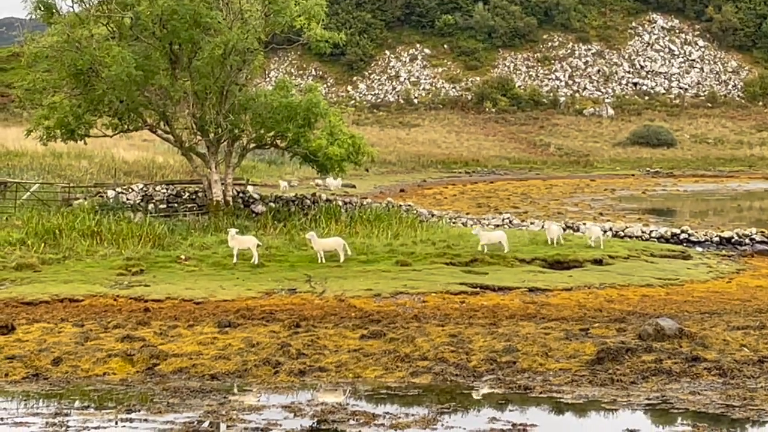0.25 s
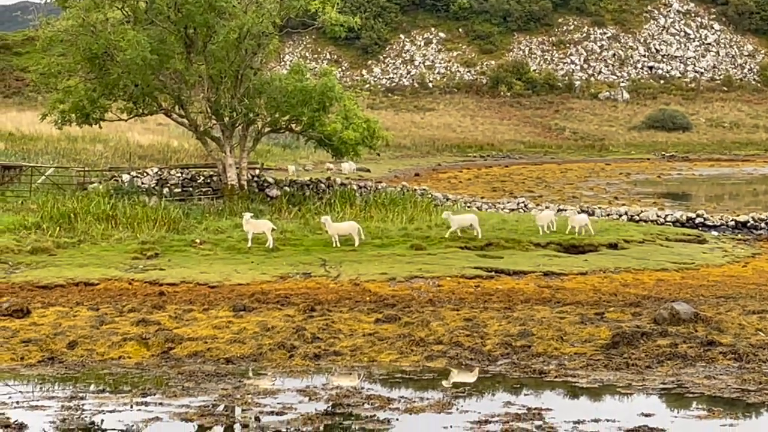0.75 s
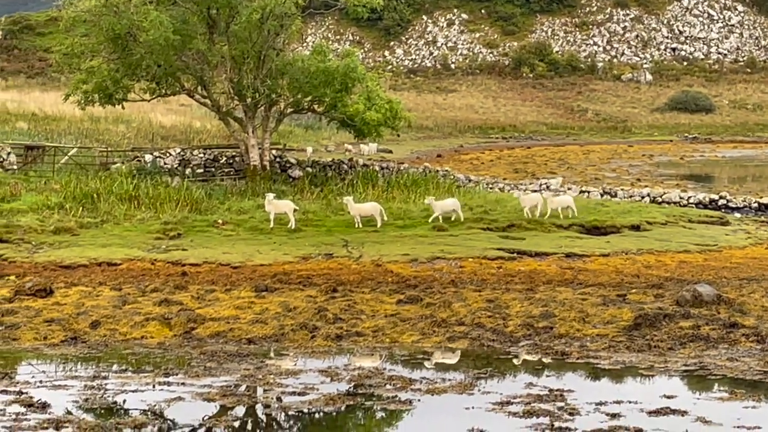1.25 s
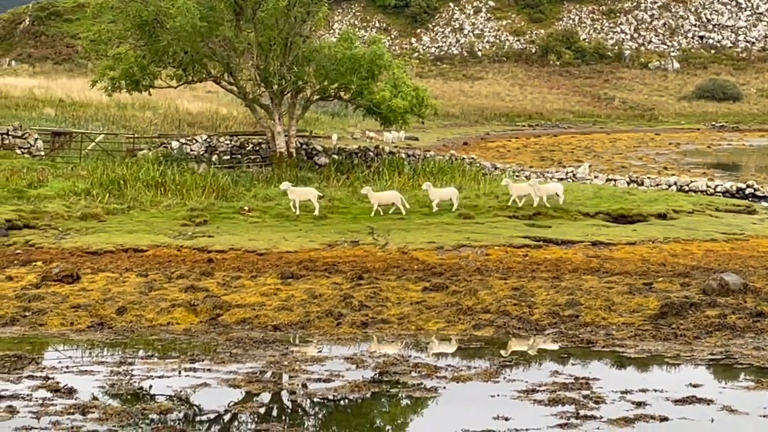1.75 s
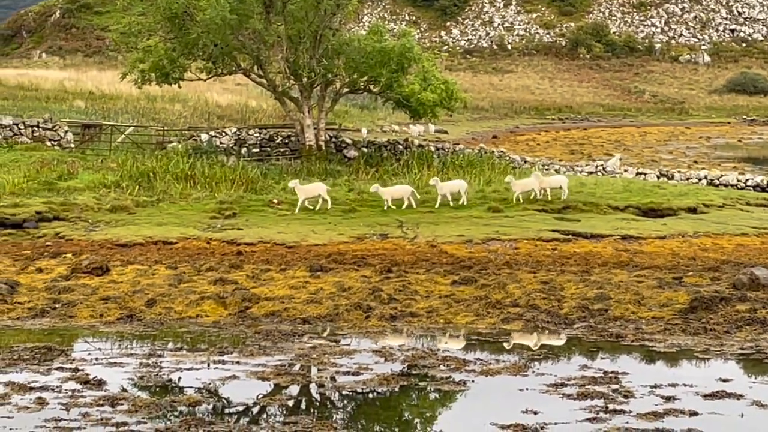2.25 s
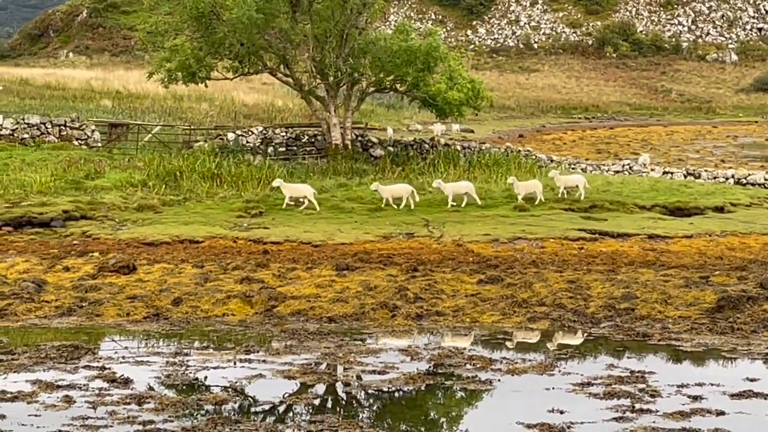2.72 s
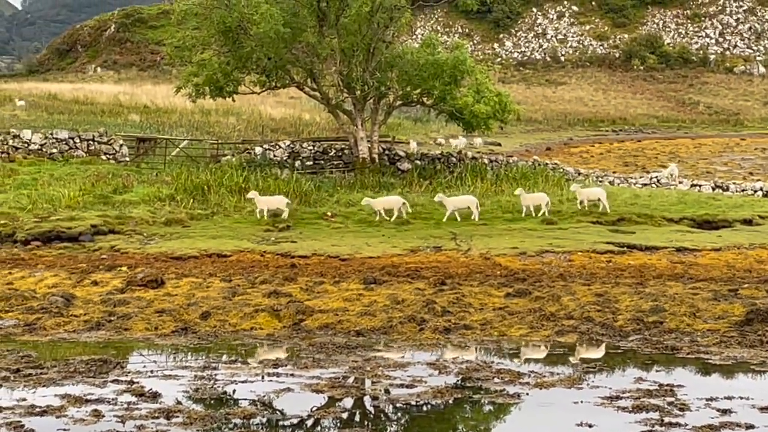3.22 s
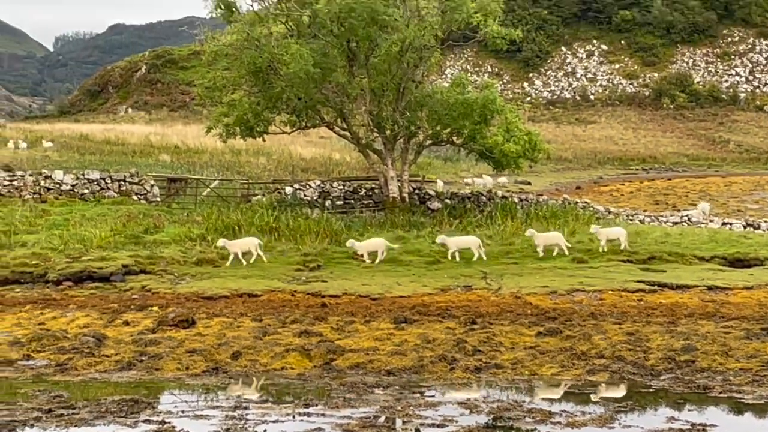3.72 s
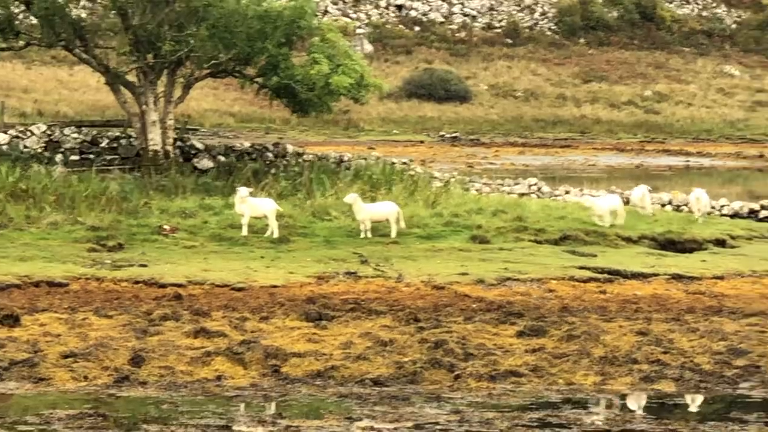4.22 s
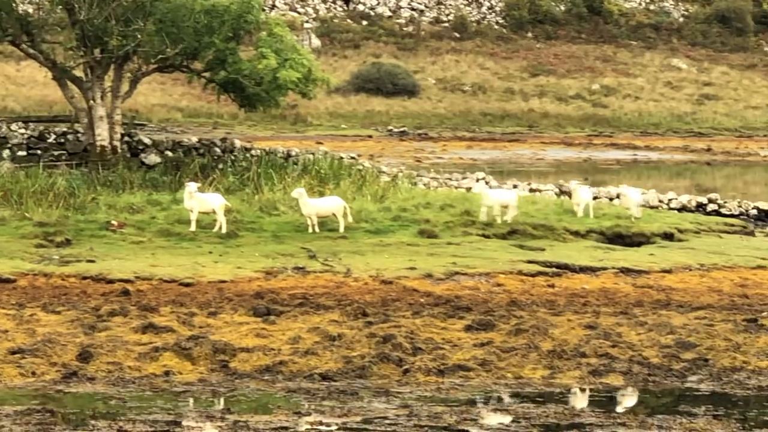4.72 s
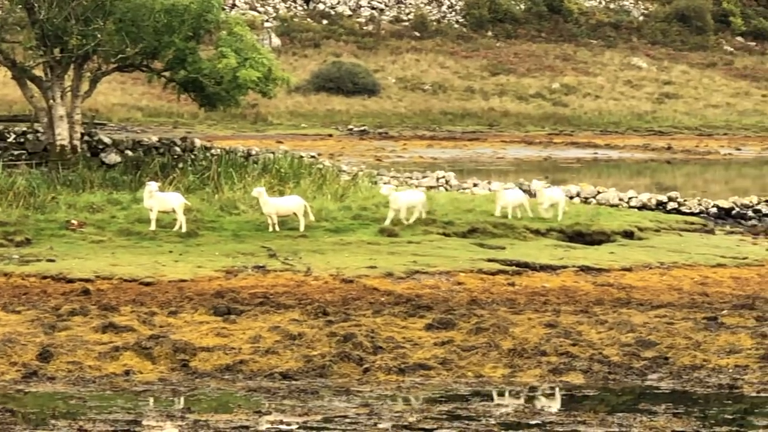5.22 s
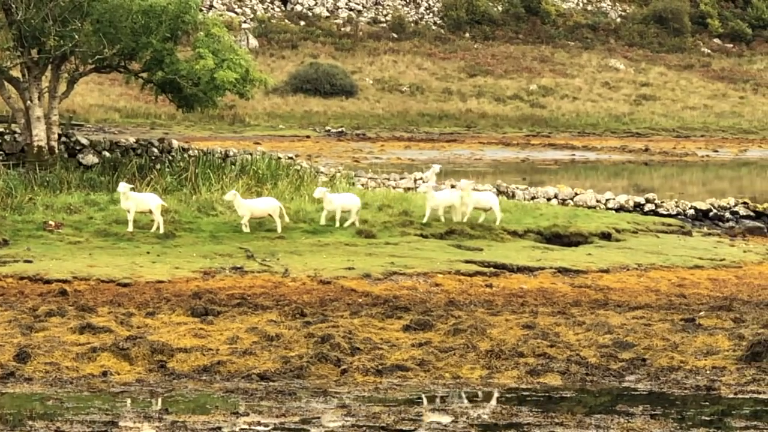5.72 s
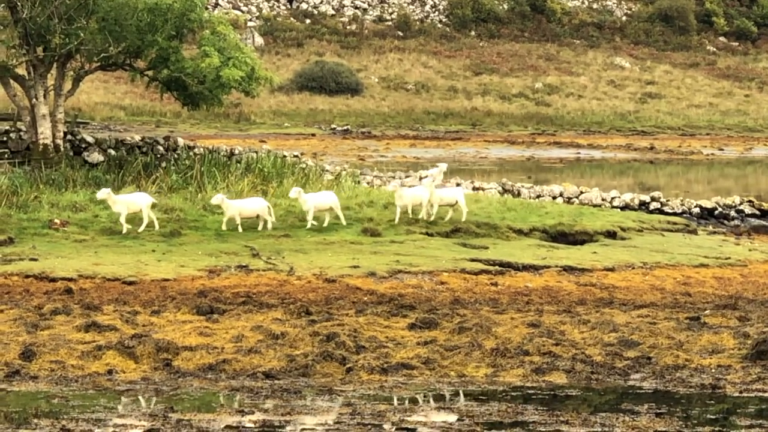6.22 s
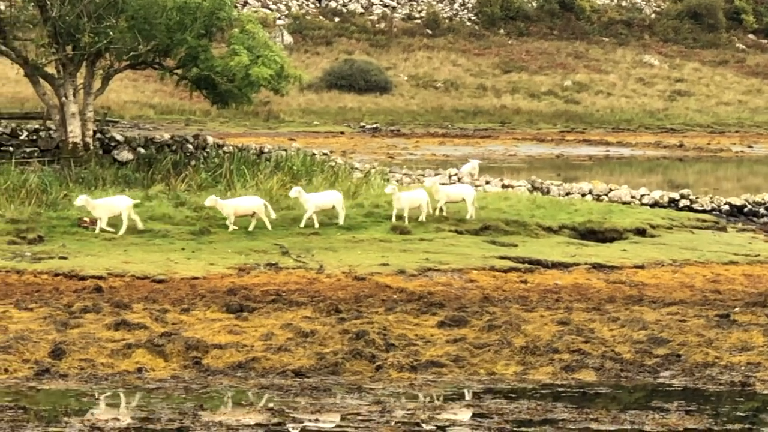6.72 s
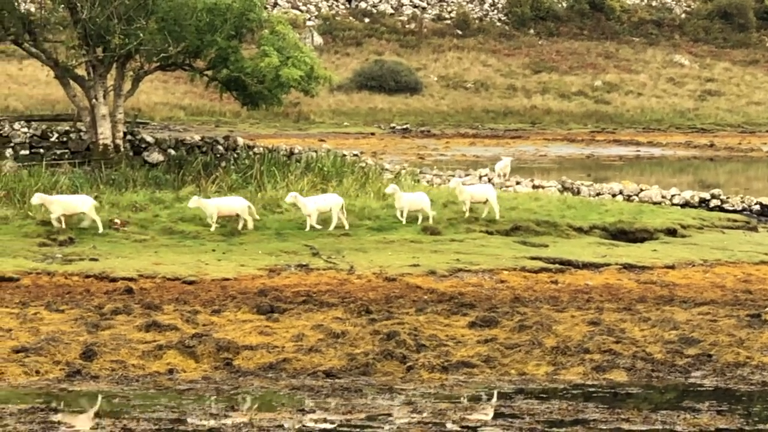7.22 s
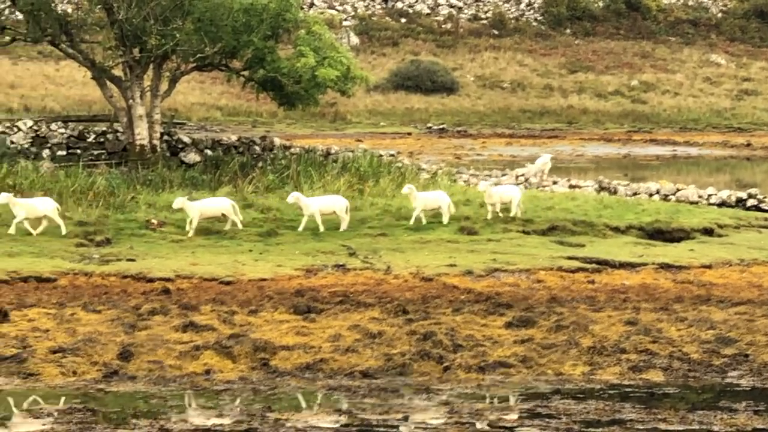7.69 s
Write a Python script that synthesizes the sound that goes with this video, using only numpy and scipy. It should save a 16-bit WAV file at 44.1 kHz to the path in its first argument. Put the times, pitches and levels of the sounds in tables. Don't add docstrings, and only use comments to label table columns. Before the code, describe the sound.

A lamb grunts and gives a quavering bleat on a quiet shore, a deeper ewe answers faintly, then both calls repeat over wind rumble.

```python
import sys
import numpy as np
from scipy import signal
from scipy.fft import rfft, irfft, next_fast_len
from scipy.io import wavfile
from scipy.ndimage import uniform_filter1d

SR = 44100
rng = np.random.default_rng(int(sys.argv[2]) if len(sys.argv) > 2 else 0)


def output_pcm(signal):
    pcm = np.clip(np.atleast_2d(signal).T, -1, 1) * 32767
    wavfile.write(sys.argv[1], SR, np.round(pcm).astype(np.int16))


def ratio_of_db(decibels):
    return 10 ** (np.asarray(decibels, float) / 20)


N = 350903

CHANGE_S = 3.957
LAG_S = 4.203

# (frequency [Hz], density [dB per Hz])
AIR_STEREO = [(220, -32.5), (380, -4.5), (416, -8.5), (749, -14.5), (940, -19), (1430, -25.5), (1620, -25),
              (6010, -32), (7210, -43), (10000, -38.5), (14000, -45)]
AIR_STEREO_SIDE = [(220, -34.5), (380, -1), (477, -4), (546, -14), (749, -7), (1270, -21), (1670, -17),
                   (2700, -40.5), (6010, -41), (7210, -23.5), (14000, -48.5)]
AIR_MONO = [(220, -25.5), (380, -7.5), (404, 1.5), (437, -1), (495, -0.5), (674, -3), (1870, -14.5),
            (8430, -19.5), (14100, -25.5), (15400, -35)]
# (time [s], level [dB])
HISS_SWELL = [(0, 3.5), (.4, 1), (0.901, 0), (2.501, 2.5), (3.4, -2), (3.9, 0.5), (4.2, 0.5), (5.401, 0.5),
              (6.8, 1), (7.96, -1.5)]
AIR_STEREO_DB, AIR_MONO_DB = -78, -77.5
# (time [s], gust level [dB])
WIND = [(0, -48.5), (.54, -46), (.62, -58.5), (.81, -46.5), (1.0, -62.5), (1.09, -46), (1.75, -50),
        (2.3, -53), (3.51, -59), (3.78, -53), (3.93, -50), (4.08, -61), (5.4, -64), (5.7, -61),
        (6.44, -66.5), (7.96, -71.5)]
LUMP_DB = 1.5
# (time [s], level [dB])
TRAFFIC = [(0, -60.5), (1.0, -63.5), (1.75, -59.5), (2.3, -59.5), (3.19, -66), (3.51, -63.5), (3.9, -64)]
MONO_TRAFFIC_DB = -5.5
# (frequency [Hz], density [dB per Hz])
GUST_STEREO = [(20, -35), (34, -6.5), (65, 4), (108, -0.5), (120, -0.5), (151, -15.5), (160, -12.5),
               (210, -38), (350, -120)]
GUST_MONO = [(20, -35.5), (34, -14), (59, 10.5), (80, -8), (97, -3), (108, 11), (160, -6), (210, -31.5),
             (350, -120)]
DRONE_STEREO = [(76, -24.5), (130, -1), (178, -8.5), (221, -2.5), (258, -12), (450, -39), (580, -75.5),
                (990, -120)]
DRONE_MONO = [(76, -32.5), (130, -22), (200, 0.5), (242, -17), (318, -15.5), (450, -30.5), (580, -60.5),
              (990, -120)]
# (time [s], firing rate [Hz], first order level [dB], second order level [dB])
ENGINE = [
    (1.0, 84.7, -62, -80.5),
    (1.55, 76.26, -59.5, -67),
    (1.9, 76.8, -54.5, -72),
    (3.17, 74.96, -60, -63.5),
    (3.95, 67.25, -51.5, -61),
]
MONO_FIRST_DB, MONO_SECOND_DB, WAVER = -14, -3.5, 0.01528
# (frequency [Hz], width [Hz], stereo level [dB], mono level [dB])
HUM = [
    (104.88, 4.54, -56, -71),
    (211.5, 8.7, -64.5, -71),
    (319.8, 11.8, -75, -74.5),
    (149.7, 4.2, -76, -85.5),
]

# (time [s], length [s], first pitch [Hz], last pitch [Hz],
# level [dB])
FAINT_NOTES = [
    (0.047, 0.17, 1695, 1645, -94.5),
    (0.541, .016, 3220, 3600, -79),
    (3.954, 0.069, 2900, 2432, -87),
    (4.43, .09, 4150, 4180, -93),
    (4.721, 0.019, 3250, 3600, -81),
    (4.0, .35, 3800, 3770, -97),
    (5.08, .12, 7150, 6900, -96),
]
NOTE_SWELL_DB = 6.5
# (time [s], level [dB], pitch factor [1])
CHIRPS = [
    (.438, -81, 0.99),
    (0.586, -79, 1),
    (.992, -80, 1),
    (4.614, -84, 1),
    (4.762, -80, 1.0),
    (5.167, -80.5, 1.0),
]
# (time [s], pitch [Hz], level [dB])
CHIRP_SHAPE = [(0, 3320, -4), (0.014, 3900, -1), (.027, 4350, 6), (0.038, 5110, 1.5), (.046, 4750, 3),
               (0.05, 4710, -12), (.057, 5400, -0.5), (.066, 5380, -4), (0.074, 5000, -9)]
THROB_HZ, THROB_DEPTH = 85, .6
# (time [s], level [dB])
ARCHES = [
    (1.369, -79),
    (2.882, -89),
    (2.984, -89.5),
    (5.548, -81),
]
# (time [s], pitch [Hz], level [dB])
ARCH_SHAPE = [(0, 4360, -9), (.008, 4820, -1.5), (.018, 5600, -1), (.03, 5100, 1.5), (.04, 4230, -1)]

HILL_GAP_S, SLAP_S, SLAP_DB = 0.014, .2, -15

# (time [s], level [dB], mouth shift [0-1])
GRUNT = [
    (1.294, -76, 0.1),
    (1.305, -62, 0),
    (1.322, -61.5, 0),
    (1.337, -53, 0.27),
    (1.392, -55.5, 0.9),
    (1.403, -65.5, 0.7),
    (1.43, -71.5, .5),
]
# (time [s], level [dB], mouth shift [0-1])
LAMB = [
    (1.436, -61, .4),
    (1.449, -45.5, 0.4),
    (1.465, -38, 0.33),
    (1.6, -34.5, 0.4),
    (2.02, -43.5, 0.43),
    (2.09, -44, 0.81),
    (2.13, -48.5, 0.89),
    (2.197, -49, 0.99),
    (2.21, -56.5, 1),
    (2.25, -60.5, 0.86),
]
# (time [s], level [dB])
EWE = [
    (2.23, -59.5),
    (2.33, -57.5),
    (2.6, -58),
    (2.9, -60),
    (2.98, -62),
    (3.004, -67),
]
# (time [s], pitch [Hz])
LAMB_PITCH = [(1.29, 206.3), (1.39, 224.3), (1.431, 212.9), (1.47, 235.8), (1.538, 246), (1.679, 243.9),
              (1.921, 236), (2.098, 230.2), (2.118, 220.1), (2.27, 214.9)]
EWE_PITCH = [(2.22, 173.4), (2.282, 171), (2.576, 178.5), (2.92, 171.6), (2.942, 168), (3.01, 155.4)]
# (time [s], half length [s], pitch drop [Hz], level drop [dB], added breath [0-1])
CATCHES = [(1.336, 0.0089, 13.5, -1, 0.47), (1.492, 0.022, 26.5, 3, 1), (1.572, .018, 14, -0.5, 0),
           (1.638, 0.014, 18.5, 3, 0), (1.712, .026, 30, 6.5, 0.5), (1.79, 0.024, 11.5, 1, 0.26),
           (1.979, 0.0246, -4.5, 0, 0.05), (2.048, 0.025, 18, 5.5, 0.62), (1.868, .015, 5, 0.5, 0),
           (2.164, .014, 6, 1.5, .3), (2.234, .03, 4, 0, .45)]
# (time [s], pitch [Hz], level [dB])
LOWING = [(1.3, 214.4, -56), (1.5, 239.9, -68.5), (2.0, 234.9, -57), (2.15, 219.4, -59), (2.3, 201.5, -51),
          (2.449, 189.6, -54.5)]
MONO_LOWING_DB = -9.5
# (frequency [Hz], density [dB per Hz])
GRUNT_STEREO_THROAT = [(240, -47), (400, -7), (896, -4), (1100, -1), (1320, -23.5), (1670, 2), (1950, 4.5),
                       (2300, -12.5), (2700, -7), (4200, -54), (5460, -70), (9240, -120)]
GRUNT_STEREO_OPEN = [(240, -45.5), (400, -8), (896, 0), (1100, -3.5), (1320, -14.5), (1600, 5.5), (1950, 2),
                     (2300, -7), (2860, 4.5), (3350, -11.5), (4200, -40.5), (5460, -72), (9240, -120)]
GRUNT_MONO_THROAT = [(240, -40), (400, 0), (548, -20), (837, -2), (1470, -7.5), (1930, 2.5), (2420, 10),
                     (2650, -17), (3280, -20), (4200, -45), (5460, -54), (9240, -120)]
GRUNT_MONO_OPEN = [(240, -40), (400, -5), (548, -14), (837, 1), (1470, -8), (1930, 1), (2420, 4),
                   (2650, -4), (3280, -1), (4200, -37), (5460, -49), (9240, -120)]
LAMB_STEREO_WIDE = [(240, -48.5), (400, -21.5), (474, -4.5), (745, 1.5), (997, -18), (1210, -32),
                    (1430, 1.5), (1630, 5), (1770, 0), (2160, -41.5), (2360, 3), (2510, 3.5), (3710, -18.5),
                    (4400, -32.5), (5720, -42.5), (9680, -120)]
LAMB_STEREO_NARROW = [(240, -36), (400, -6), (442, -14), (681, 1.5), (1110, -8), (1400, -4.5), (1730, -10),
                      (2200, -1.5), (2950, -0.5), (3100, 1), (3320, -22), (3790, -7), (4400, -52),
                      (5720, -85), (9680, -120)]
LAMB_SIDE = [(240, -39), (400, -5), (731, 0), (1180, -23), (1450, -7.5), (1740, 6), (1980, -16),
             (2120, -24), (2950, -7.5), (3800, -42), (4940, -73), (8360, -120)]
LAMB_MONO_WIDE = [(240, -37), (400, -25.5), (745, -7.5), (997, -11.5), (1210, -31), (1490, -4.5),
                  (1880, -12), (2160, 1), (2480, 8.5), (2750, -23), (3010, 2), (3460, -10.5), (4100, -54),
                  (4400, -17.5), (5720, -77), (9680, -120)]
LAMB_MONO_NARROW = [(240, -42), (400, -9), (674, 0.5), (1090, -14), (1530, -0.5), (1950, -17), (2430, 4.5),
                    (2770, -9.5), (3070, -8.5), (3320, -15), (3790, -9), (4400, -43), (5720, -54),
                    (9680, -120)]
EWE_STEREO_THROAT = [(94, -38), (160, -3.5), (188, 5), (336, -20), (552, -23), (897, -22.5), (1080, -30),
                     (1440, -23.5), (1670, -38), (1990, -12), (2210, -13.5), (2930, -25.5), (4000, -60),
                     (5200, -90), (8800, -120)]
EWE_SIDE = [(94, -32), (160, 1), (322, 7), (545, -21), (1270, -21.5), (2120, 1), (2530, -18), (2970, -24),
            (4000, -58), (5200, -89), (8800, -120)]
EWE_MONO_THROAT = [(94, -23), (160, 0), (327, -4.5), (476, -26), (676, -20), (862, -9.5), (1330, -27.5),
                   (1880, -9), (2150, -7.5), (2330, -23), (2670, -8), (3400, -28), (4000, -27), (5200, -54),
                   (8800, -120)]
# (frequency [Hz], density [dB per Hz])
TOP_STEREO = [(2350, -44), (4000, -10), (4400, -9), (4800, -15), (5200, 0.5), (5550, 4), (5950, -14),
              (6400, 4), (6800, -19), (7250, -12), (7800, -31.5), (9000, -26), (10100, -15.5), (12300, -36),
              (13000, -36.5)]
TOP_STEREO_LATE = [(2350, -46.5), (4000, -9), (4600, -16.5), (5150, -5.5), (5650, 3.5), (6050, -21),
                   (6500, 0.5), (6900, -21), (7900, -32.5), (8400, -17), (8900, -31), (10100, -24.5),
                   (12300, -40), (13000, -41)]
TOP_MONO = [(2350, -35), (4000, -6.5), (4960, -22), (5550, 2.5), (6090, -19), (6600, -2), (7310, -28),
            (7900, -9), (8490, -25), (9220, -18), (12000, -32.5), (13600, -24), (15000, -35)]
TOP_MONO_LATE = [(2350, -32), (4000, -5), (4960, -21), (5750, 1), (6200, -14), (6900, -4), (7400, -21),
                 (8000, -11.5), (8600, -23), (9220, -20), (12000, -38), (13600, -28), (15000, -38.5)]
TOP_SIDE = [(6300, -10.5), (7200, 8), (9000, -13.5), (12500, -19)]
TOP_TURNS_S, TOP_TURN_LENGTH_S = 1.57, .25
TOP_PATCH_DB, LAMB_SHIMMER_DB, EWE_SHIMMER_DB = 1.9, 1.5, .9
VEIL_LIFTS_S, VEIL_LIFT_LENGTH_S, VEIL_DB_PER_BAND = 1.48, .04, 0.9
MONO_SQUEEZE = 0.78
CHEST_HZ, CHEST_KEEPS = 793, 0.96
SHUT_FROM, SHUT_LOSS_DB = .87, 16
BREATH_PER_DB, LAMB_BREATH, GRUNT_BREATH, EWE_BREATH = .006, .07, .42, .26

# (time [s], peak level [dB], pitch [Hz])
TICKS = [
    (3.234, -64.5, 3820),
    (3.5516, -69.5, 9800),
    (4.1, -67, 3130),
    (4.3395, -65, 5750),
    (4.5356, -69, 2940),
    (5.027, -68, 4880),
    (3.397, -73, 5810),
    (6.95, -67, 6097),
    (7.267, -72, 5700),
]
# (time [s], level [dB])
BRUSH = [
    (3.84, -87),
    (3.906, -71),
    (3.97, -72),
]


def one(x):
    return x / np.sqrt(np.mean(x ** 2) + 1e-20)


def columns(rows):
    s, *values = np.transpose(rows)
    start = max(0, round(s[0] * SR))
    t = np.arange(start, min(N, round(s[-1] * SR))) / SR
    fade = np.clip(np.minimum(t - s[0], s[-1] - t) / 0.0047, 0, 1)
    return start, fade, [np.interp(t, s, v) for v in values]


def add(out, start, x):
    out[..., start:start + x.shape[-1]] += x[..., :N - start]


def colour(x, spectrum):
    size = next_fast_len(len(x) + 4096)
    hz, db = np.transpose(spectrum)
    log_f = np.log(np.maximum(np.fft.rfftfreq(size, 1 / SR), 1))
    knots_hz = np.r_[hz[0] / 2, hz, hz[-1] * 1.2]
    knots_db = np.r_[db[0] - 40, db, db[-1] - 40]
    log_gain = np.interp(log_f, np.log(knots_hz), knots_db) * np.log(10) / 20
    cepstrum = irfft(log_gain, size)
    cepstrum[1:size // 2] *= 2
    cepstrum[size // 2 + 1:] = 0
    return irfft(rfft(x, size) * np.exp(rfft(cepstrum)), size)[:len(x)]


def drift(rate, size):
    r = np.exp(-2 * np.pi * rate / SR)
    settle = SR // 3
    return one(signal.lfilter([1], [1, -2 * r, r * r], rng.standard_normal(size + settle))[settle:])


def air(spectrum, db):
    swell_db = np.interp(np.arange(N) / SR, *np.transpose(HISS_SWELL))
    return ratio_of_db(db + swell_db) * one(colour(rng.standard_normal(N), spectrum))


def rumble(t0, t1, gust, drone, lag=0, drone_db=0):
    start, fade, _ = columns([(t0, 0), (t1, 0)])
    t = (start + np.arange(len(fade))) / SR
    gust_db = np.interp(t, *np.transpose(WIND)) + LUMP_DB * drift(4.4, len(t))
    traffic_db = np.interp(t - lag, *np.transpose(TRAFFIC)) + drone_db
    white, out = rng.standard_normal((2, len(fade))), np.zeros(N)
    wind = ratio_of_db(gust_db) * one(colour(white[0], gust))
    traffic = ratio_of_db(traffic_db) * one(colour(white[1], drone))
    add(out, start, fade * (wind + traffic))
    return out


def hums():
    stereo, out = np.clip((CHANGE_S - np.arange(N) / SR) / 0.018, 0, 1), np.zeros(N)
    for hz, width_hz, stereo_db, mono_db in HUM:
        sos = signal.butter(2, [hz - width_hz / 2, hz + width_hz / 2], "band", fs=SR, output="sos")
        hum = one(signal.sosfilt(sos, rng.standard_normal(N + SR))[SR:])
        out += hum * ratio_of_db(stereo * stereo_db + (1 - stereo) * mono_db)
    return out


def glide(rows, flutter_db, throb=0):
    start, fade, (hz, db) = columns(rows)
    phase = 2 * np.pi * np.cumsum(uniform_filter1d(hz, 100)) / SR
    t = np.arange(len(hz)) / SR
    fade = fade * (1 + throb * np.cos(2 * np.pi * THROB_HZ * (t - .004)))
    out = np.zeros(N)
    add(out, start, np.sqrt(2) * ratio_of_db(db + flutter_db * drift(40, len(hz))) * fade * np.sin(phase))
    return out


def birds():
    chirps = [np.array(CHIRP_SHAPE) * [1, factor, 1] + [s, 0, db] for s, db, factor in CHIRPS]
    chirps += [np.array(ARCH_SHAPE) + [s, 0, db] for s, db in ARCHES]
    song = sum(glide(rows, flutter_db=3.0, throb=THROB_DEPTH) for rows in chirps)
    for s, length, hz, end_hz, db in FAINT_NOTES:
        rows = [(s, hz, db - NOTE_SWELL_DB),
                (s + length / 2, (hz + end_hz) / 2, db),
                (s + length, end_hz, db - NOTE_SWELL_DB)]
        song += glide(rows, flutter_db=6.0)
    return song


def hillside(x, t60, cut_hz, slap_db):
    t = np.arange(round(.6 * SR)) / SR
    slope = ratio_of_db(-60 * t / t60) * (t > HILL_GAP_S)
    bank = ratio_of_db(slap_db - 60 * (t - SLAP_S) / 0.58) * (t > SLAP_S)
    tail = rng.standard_normal((2, len(t))) * (slope + bank)
    tail = signal.sosfilt(signal.butter(2, [950, cut_hz], "band", fs=SR, output="sos"), tail)
    tail = tail / np.sqrt(np.sum(tail ** 2, axis=1, keepdims=True))
    return signal.fftconvolve(x[None], tail, axes=1)[:, :N]


def engine():
    out = np.zeros(N)
    for rows in ENGINE, np.array(ENGINE[1:]) + [LAG_S, 0, MONO_FIRST_DB, MONO_SECOND_DB]:
        start, fade, (hz, first_db, second_db) = columns(rows)
        phase = 2 * np.pi * np.cumsum(hz * (1 + WAVER * drift(3.0, len(hz)))) / SR
        orders = ratio_of_db(first_db) * np.sin(phase) + ratio_of_db(second_db) * np.sin(2 * phase)
        add(out, start, np.sqrt(2) * fade * orders)
    return out


def effort(rows, breath, top_db, top_db_per_s, lag=0, gain_db=0):
    s, db, *mouth = np.transpose(rows)
    below_db = db.max() - db
    heard_db = db.max() + gain_db - below_db * (MONO_SQUEEZE if lag else 1)
    return np.transpose([s + lag, heard_db, top_db + top_db_per_s * (s - s[0]), breath + BREATH_PER_DB * below_db,
                         mouth[0] if mouth else 0 * s])


def larynx(t, pitch, catches):
    hz, loss_db, breath = np.interp(t, *np.transpose(pitch)), 0, 0
    for s, half_s, drop_hz, drop_db, puff in catches:
        dip = np.cos(np.pi / 2 * np.clip((t - s) / (half_s * 1.4), -1, 1)) ** 2
        hz = hz - drop_hz * dip
        loss_db = loss_db + drop_db * dip
        breath = breath + puff * dip
    return hz, loss_db, breath


def glottis(hz, shimmer_db):
    size = len(hz)
    jitter = .003 * drift(70, size) + .002 * shimmer_db * drift(14, size)
    phase = 2 * np.pi * np.cumsum(uniform_filter1d(hz, 200) * (1 + jitter)) / SR
    shimmer = [ratio_of_db(shimmer_db * drift(12, size)) for _ in range(8)]
    pulses = one(sum(shimmer[k // 2 % 8] * np.cos(k * phase) for k in range(1, 61)))
    puffs = one(rng.standard_normal(size) * (1 + np.cos(phase)) ** 2)
    return pulses, puffs


def patchy(x, depth_db, veil_db):
    edges = 3200 * 2 ** (np.arange(8) / 3)
    out = 0
    for k, band in enumerate(zip(edges, edges[1:])):
        part = signal.sosfilt(signal.butter(2, band, "band", fs=SR, output="sos"), x)
        gain = ratio_of_db(depth_db * drift(8.9, len(x)) - k * veil_db)
        out = out + (-1) ** k * gain * part
    return out


def bleat(rows, pitch, catches, wide, narrow, top, side, side_db, lag=0, shimmer_db=LAMB_SHIMMER_DB):
    start, fade, (db, top_db, breath, shift) = columns(rows)
    t = (start + np.arange(len(db))) / SR - lag
    hz, loss_db, puff = larynx(t, pitch, catches)
    pulses, puffs = glottis(hz, shimmer_db)
    chest = signal.sosfilt(signal.butter(4, CHEST_HZ, fs=SR, output="sos"), pulses)
    shut = np.clip((shift - SHUT_FROM) / (1 - SHUT_FROM), 0, 1)
    chest_db = CHEST_KEEPS * loss_db - SHUT_LOSS_DB * shut
    breath, shift = np.clip(breath + puff, 0, 1), np.clip(shift, 0, 1)
    source = np.sqrt(1 - breath ** 2) * pulses + breath * puffs
    source = signal.sosfilt(signal.butter(4, CHEST_HZ, "high", fs=SR, output="sos"), source)
    source = source + ratio_of_db(chest_db) * chest
    mid = (1 - shift) * one(colour(source, wide)) + shift * one(colour(source, narrow))
    rasp = .85 * source + .5 * puffs
    top_gain = ratio_of_db(top_db - 0.25 * loss_db + 1.0 * drift(22, len(hz)))
    turn = np.clip((t - TOP_TURNS_S) / TOP_TURN_LENGTH_S, 0, 1)
    veil_db = VEIL_DB_PER_BAND * np.clip(1 - (t - VEIL_LIFTS_S) / VEIL_LIFT_LENGTH_S, 0, 1)
    bright = (1 - turn) * one(colour(rasp, top[0])) + turn * one(colour(rasp, top[1]))
    mid += top_gain * patchy(bright, TOP_PATCH_DB, veil_db)
    off_axis = -ratio_of_db(side_db) * one(colour(source, side))
    off_axis += ratio_of_db(-7.5) * top_gain * one(colour(np.roll(rasp, 9), TOP_SIDE))
    out = np.zeros((2, N))
    add(out, start, np.array([mid, off_axis]) * ratio_of_db(db - loss_db) * fade)
    return out


def flock():
    top_stereo, top_mono = (TOP_STEREO, TOP_STEREO_LATE), (TOP_MONO, TOP_MONO_LATE)
    lamb = bleat(effort(GRUNT, GRUNT_BREATH, top_db=-34.0, top_db_per_s=93), LAMB_PITCH, CATCHES,
                 GRUNT_STEREO_THROAT, GRUNT_STEREO_OPEN, top_stereo, LAMB_SIDE, side_db=-13.5)
    lamb += bleat(effort(LAMB, LAMB_BREATH, top_db=-20.5, top_db_per_s=-17.5), LAMB_PITCH, CATCHES,
                  LAMB_STEREO_WIDE, LAMB_STEREO_NARROW, top_stereo, LAMB_SIDE, side_db=-12.5)
    lamb += bleat(effort(GRUNT, GRUNT_BREATH, top_db=-28, top_db_per_s=68, lag=LAG_S, gain_db=-6.0),
                  LAMB_PITCH, CATCHES, GRUNT_MONO_THROAT, GRUNT_MONO_OPEN, top_mono, LAMB_SIDE, -20, LAG_S)
    lamb += bleat(effort(LAMB, LAMB_BREATH, top_db=-18.5, top_db_per_s=-13.0, lag=LAG_S, gain_db=-8.0),
                  LAMB_PITCH, CATCHES, LAMB_MONO_WIDE, LAMB_MONO_NARROW, top_mono, LAMB_SIDE, -20, LAG_S)
    ewe = bleat(effort(EWE, EWE_BREATH, top_db=-54, top_db_per_s=17), EWE_PITCH, [], EWE_STEREO_THROAT,
                EWE_STEREO_THROAT, top_stereo, EWE_SIDE, side_db=-16.0, shimmer_db=EWE_SHIMMER_DB)
    ewe += bleat(effort(EWE, EWE_BREATH, top_db=-41, top_db_per_s=4, lag=LAG_S, gain_db=-9.5), EWE_PITCH, [],
                 EWE_MONO_THROAT, EWE_MONO_THROAT, top_mono, EWE_SIDE, -20, LAG_S, EWE_SHIMMER_DB)
    lamb_echo = ratio_of_db(np.array([[-17], [-22]])) * hillside(lamb[0], t60=.3, cut_hz=2300, slap_db=SLAP_DB)
    ewe_echo = ratio_of_db(-19) * hillside(ewe[0], t60=.15, cut_hz=3000, slap_db=-60)
    return lamb + lamb_echo + ewe + ewe_echo


def lowing():
    mono = np.array(LOWING) + [LAG_S, 0, MONO_LOWING_DB]
    return glide(LOWING, flutter_db=2.5) + glide(mono, flutter_db=2.5)


def ticks():
    out, t = np.zeros(N), np.arange(400) / SR
    for s, db, hz in TICKS:
        add(out, round(s * SR), ratio_of_db(db) * np.exp(-t / 0.0012) * np.sin(2 * np.pi * hz * t))
    return out


def brush():
    start, fade, (db,) = columns(BRUSH)
    out = np.zeros(N)
    scratch = rng.standard_normal(len(db)) * ratio_of_db(3.2 * drift(80, len(db)))
    contact = [(500, 0.5), (750, 3.0), (1100, -3), (1600, -15), (3300, -17.0)]   # (frequency [Hz], density [dB per Hz])
    add(out, start, ratio_of_db(db) * fade * one(colour(scratch, contact)))
    return out


def scene():
    stereo = np.clip((CHANGE_S - np.arange(N) / SR) / 0.0044, 0, 1)
    hiss = stereo * air(AIR_STEREO, AIR_STEREO_DB) + (1 - stereo) * air(AIR_MONO, AIR_MONO_DB)
    low = rumble(0, CHANGE_S, GUST_STEREO, DRONE_STEREO)
    low += rumble(CHANGE_S, N / SR, GUST_MONO, DRONE_MONO, LAG_S, MONO_TRAFFIC_DB)
    low += hums() + engine() + lowing()
    song, sheep = birds(), flock()
    echo_gain = stereo * ratio_of_db(-7) + (1 - stereo) * ratio_of_db(-11)
    song_echo = hillside(song, t60=.24, cut_hz=7000, slap_db=-60)[0] * echo_gain
    mid = sheep[0] + song + song_echo + ticks() + brush() + low + hiss
    own_wind = ratio_of_db(-26.0) * rumble(0, CHANGE_S, GUST_STEREO, DRONE_STEREO)
    own_wind += ratio_of_db(-66.5) * one(colour(rng.standard_normal(N), DRONE_STEREO))
    low_side = own_wind - ratio_of_db(-17.5) * low
    side = stereo * (sheep[1] + low_side + ratio_of_db(-10) * brush() + air(AIR_STEREO_SIDE, AIR_STEREO_DB - 3.0))
    return np.array([mid + side, mid - side])


def band_limit(x):
    return signal.sosfilt(signal.butter(12, 15570, fs=SR, output="sos"), x)


def record(dry):
    return band_limit(dry)


dry = scene()
out = record(dry)
output_pcm(out)
```